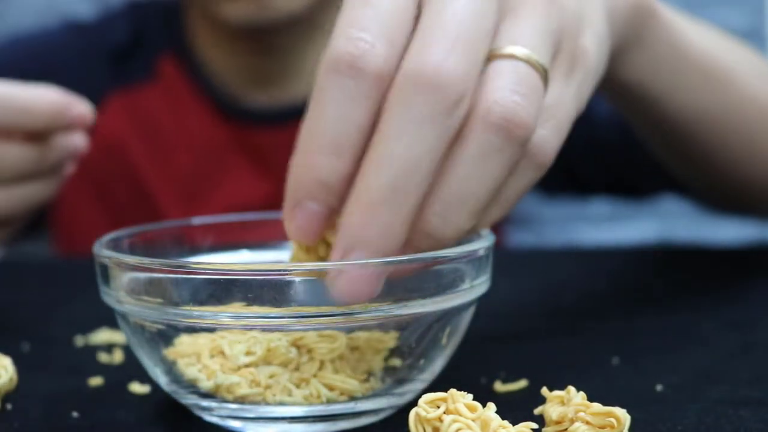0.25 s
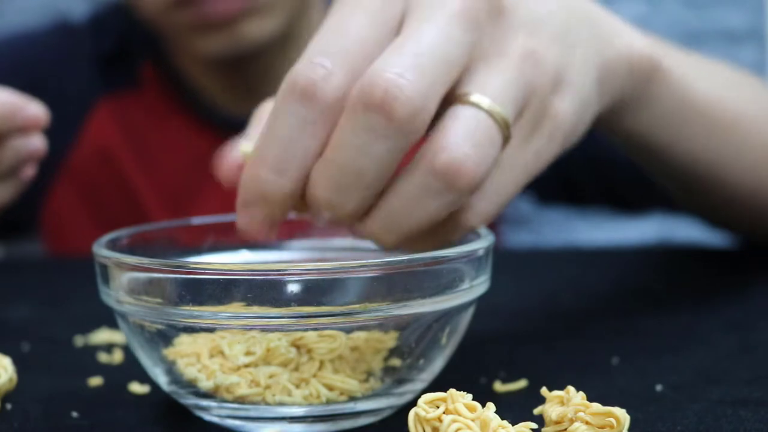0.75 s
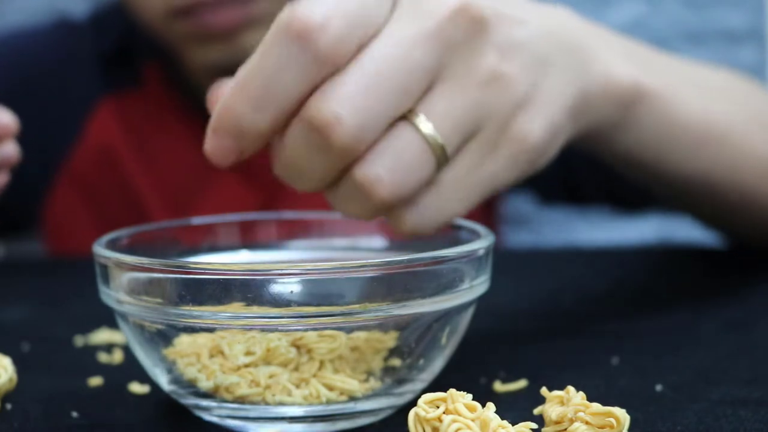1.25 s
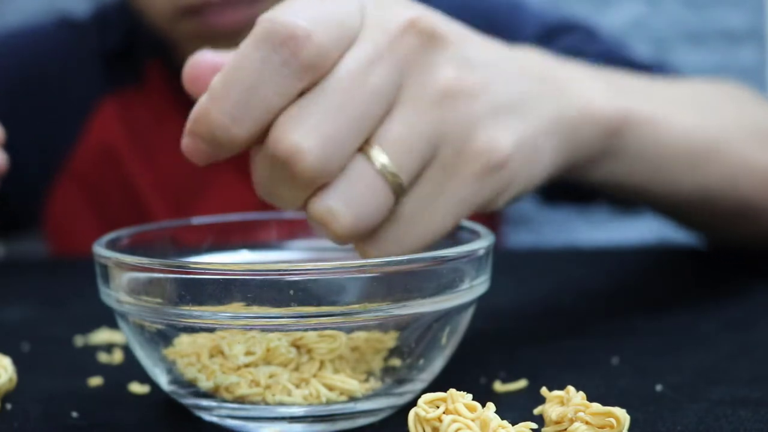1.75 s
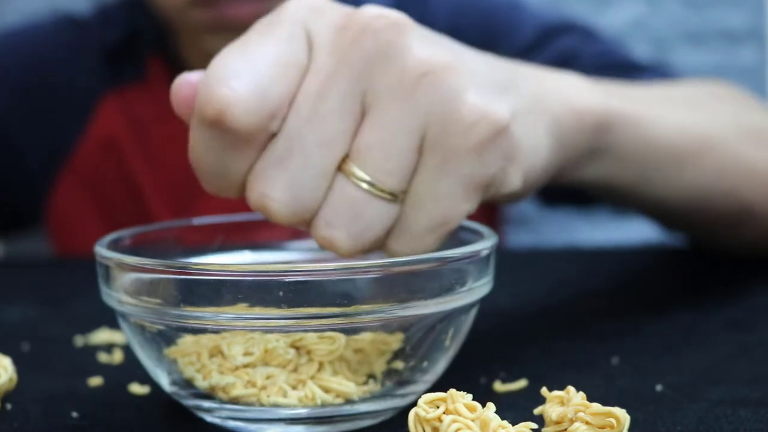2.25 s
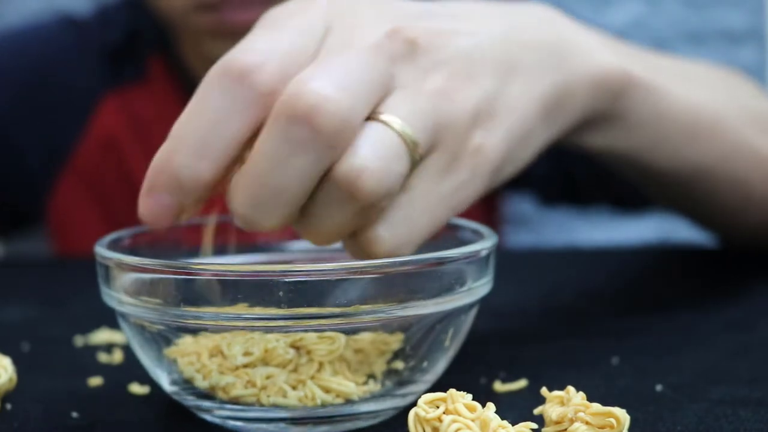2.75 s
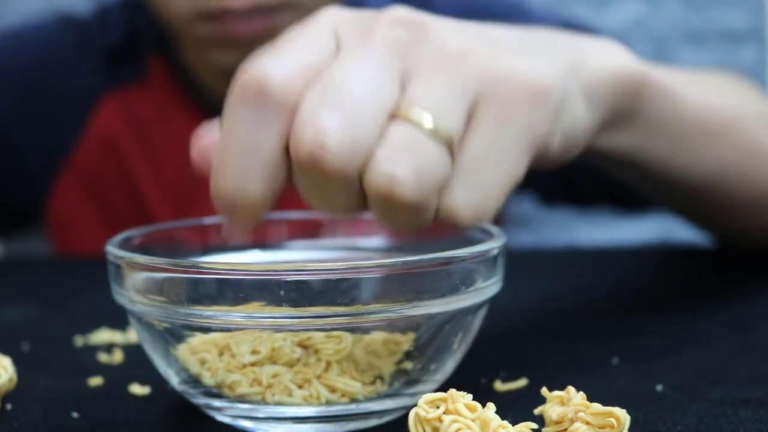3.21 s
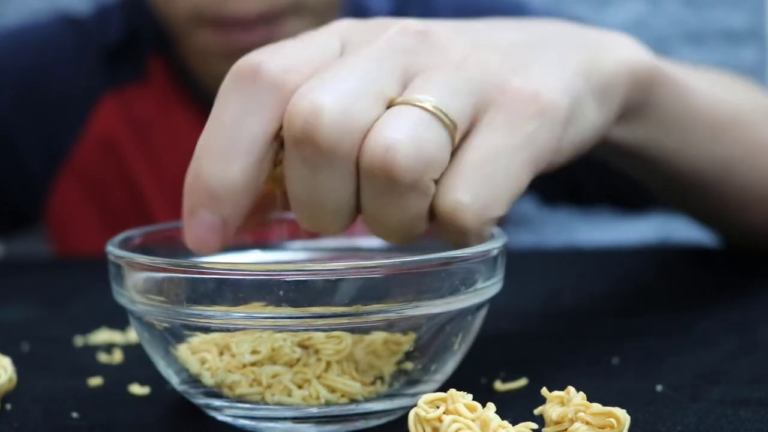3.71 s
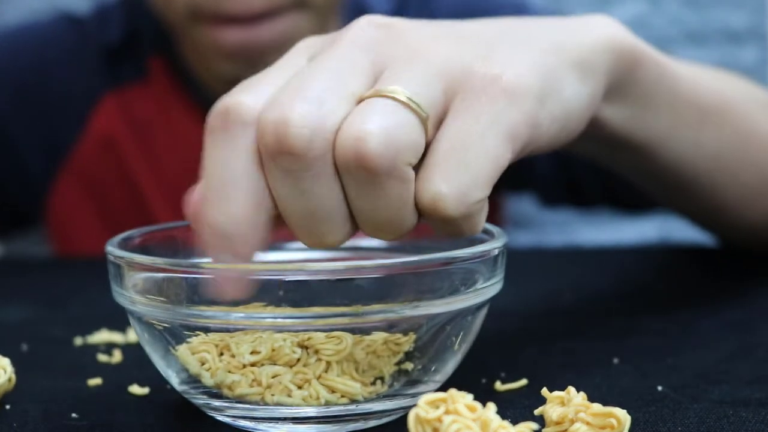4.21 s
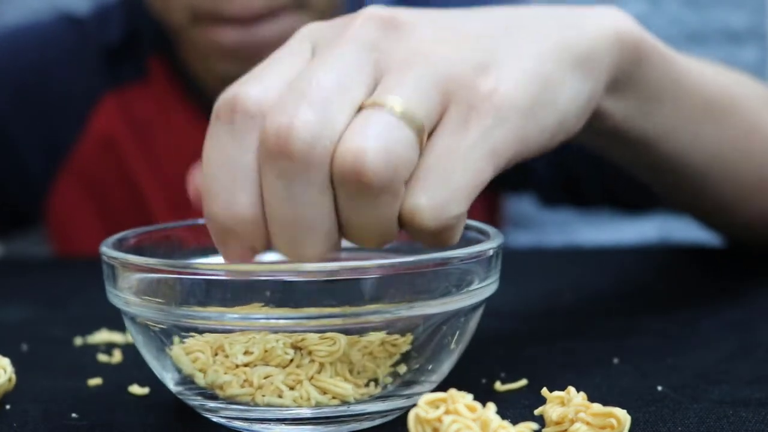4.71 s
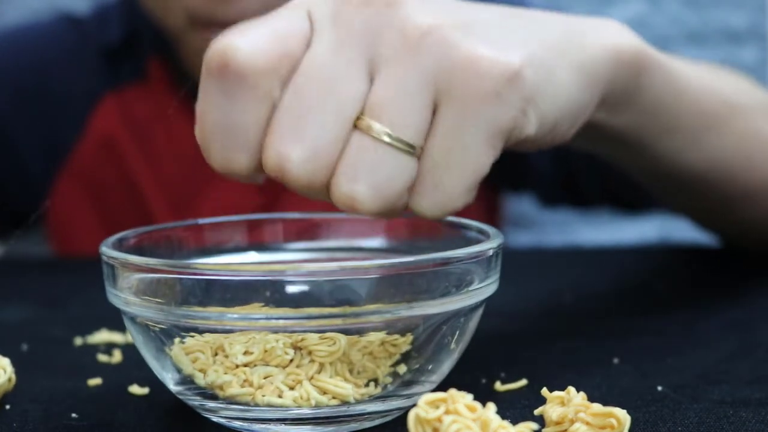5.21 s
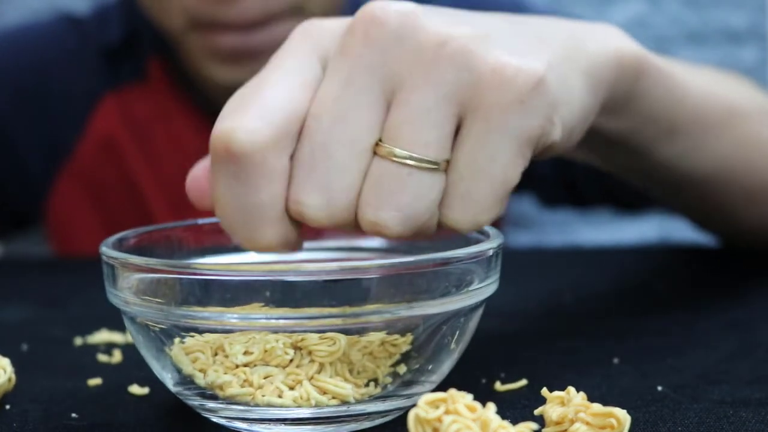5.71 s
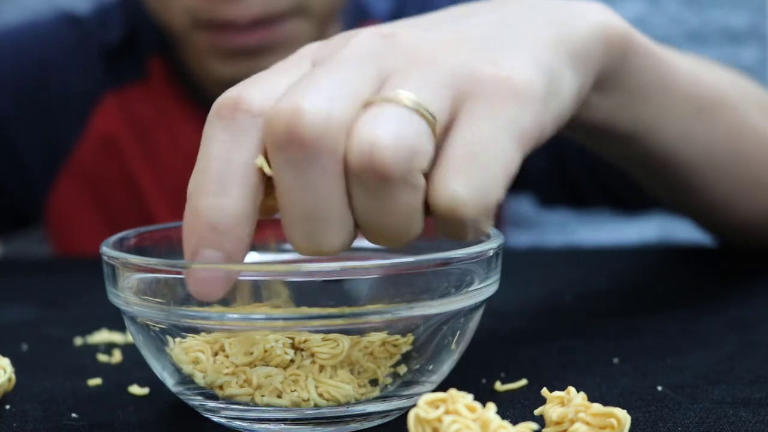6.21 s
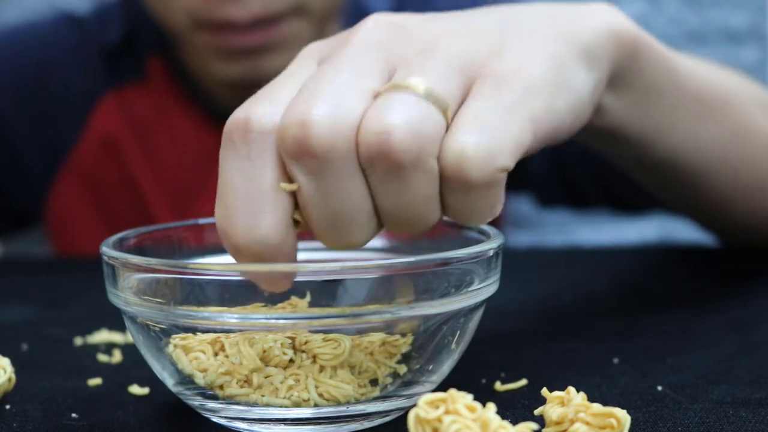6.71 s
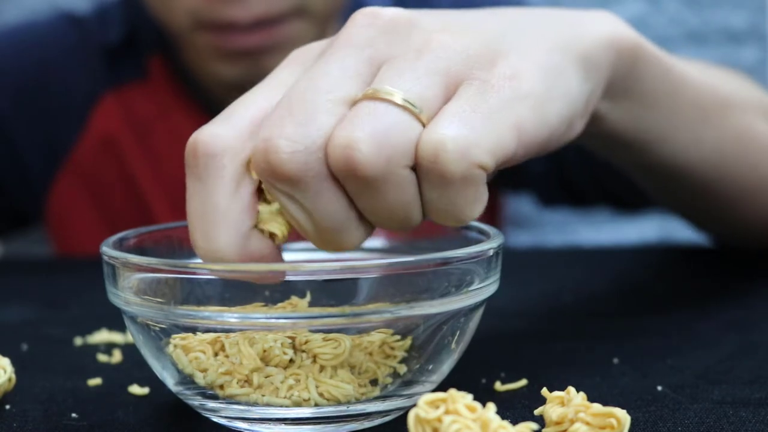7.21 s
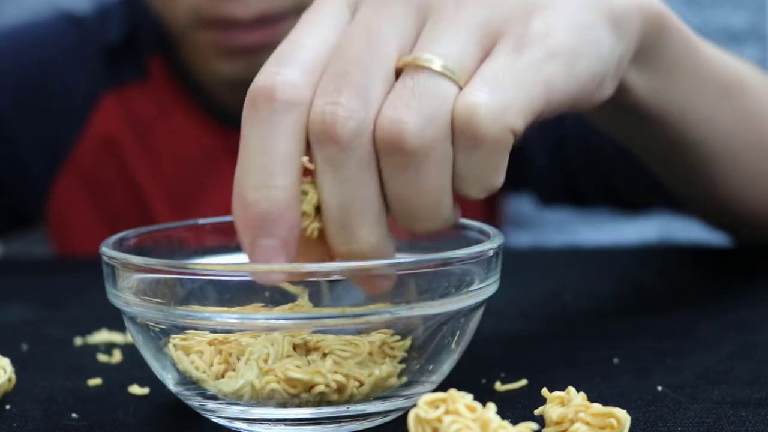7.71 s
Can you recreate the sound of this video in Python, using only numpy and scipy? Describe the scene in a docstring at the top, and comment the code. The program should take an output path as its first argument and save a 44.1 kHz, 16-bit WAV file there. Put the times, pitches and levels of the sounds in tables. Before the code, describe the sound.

Crisp crunching of brittle dry noodles in fingers, coming in bursts between quiet pauses, with faint glassy tinks from a bowl in a small room.

```python
"""Crushing dry noodles over a glass bowl

A hand crushes dry instant noodles close to one microphone in a small room. Strands are filtered bursts
of noise, crumbs are clumped random fractures, and air rings as narrow noise in the closed fist.
Touches ring the bowl's sine modes, and low thumps are decaying bands of noise."""
import sys
import numpy as np
from scipy import signal
from scipy.fft import rfft, irfft
from scipy.io import wavfile
from scipy.ndimage import uniform_filter1d, minimum_filter1d, map_coordinates

SR = 44100
rng = np.random.default_rng(int(sys.argv[2]) if len(sys.argv) > 2 else 0)


def store_pcm(level_fs):
    """Save levels as 16-bit WAV."""
    pcm = np.round(np.clip(level_fs, -1, 1) * 32767).astype(np.int16)
    wavfile.write(sys.argv[1], SR, np.atleast_2d(pcm).T)


N = 350595
TIME = np.arange(N) / SR


def amp(db):
    """Decibels to gain."""
    return 10 ** (np.asarray(db) / 20)


def unit(x):
    """Scaled to rms 1."""
    return x / np.sqrt(np.mean(x ** 2) + 1e-20)


def along(points, hz):
    """Points of (f/Hz, value) read on a log frequency axis."""
    f, v = np.transpose(points)
    return np.interp(np.log(hz + 1), np.log(f), v)


def add(track, s, sound):
    """Mix a sound in at a time in seconds."""
    part = track[max(round(s * SR), 0):][:len(sound)]
    part += sound[:len(part)]


def coloured(x, points, size=2048):
    """EQ to the given spectrum, minimum phase so that nothing smears ahead of a hit."""
    cepstrum = irfft(np.log(amp(along(points, np.fft.rfftfreq(size, 1 / SR)))))
    # folding the cepstrum forward makes the filter causal
    cepstrum[1:size // 2] *= 2
    cepstrum[size // 2 + 1:] = 0
    impulse = irfft(np.exp(rfft(cepstrum)))
    return signal.fftconvolve(x, impulse)[:len(x)]


def resonate(x, hz, width_hz):
    """A steep-sided resonance: a band-pass held inside the audible range."""
    edges = np.clip([hz - width_hz / 2, hz + width_hz / 2], 20, [SR * .44, SR * .48])
    return signal.lfilter(*signal.butter(2, edges, 'band', fs=SR), x)


def wobble(rate):
    """A smooth random curve, rate knots a second."""
    knots = rng.standard_normal(int(N * rate / SR) + 4)
    return map_coordinates(knots, [TIME * rate])


def fractures(size, rate, spread_db, grain_s):
    """Spiky force of rms 1: random tiny breaks, rate a second, their sizes spread by spread_db."""
    happens = rng.random(size) < rate / SR
    breaks = happens * amp(spread_db * np.minimum(rng.exponential(size=size), 4))
    envelope = signal.lfilter([1], [1, -np.exp(-1 / (grain_s * SR))], breaks)
    return unit(envelope * rng.standard_normal(size))


# spectrum of room tone and hiss: (f/Hz, relative level/dB)
AIR_SPECTRUM = [(12, -29), (20, -16.5), (53, 0.5), (111, -3), (147, 0.5), (212, -13), (251, -7),
                (342, -4.5), (794, -11), (2510, -18.5), (6710, -20), (7950, -12.5), (8650, -23),
                (14700, -14.5), (16500, -58)]


def air(tone_db=-61, drone_db=-70, drone_hz=245, drone_width_hz=90):
    """Steady shaped noise for room tone and microphone hiss, with a faint low drone."""
    tone = unit(coloured(rng.standard_normal(N), AIR_SPECTRUM, size=16384))
    drone = unit(resonate(rng.standard_normal(N), drone_hz, drone_width_hz))
    return amp(tone_db) * tone + amp(drone_db) * drone


# skin slides over noodle: (t/s of the peak, level/dB, length/s as the sigma of a bell-shaped swell)
RUBS = [(.145, -67, 0.011), (.226, -50.5, 0.0085), (0.732, -48, 0.0096), (0.758, -52, 0.0062),
        (3.907, -44, 0.024)]
# spectrum of the slide: (f/Hz, relative level/dB)
SKIN = [(1000, -28), (4500, -18), (6200, 3), (8500, -2), (12500, 16), (15500, -14)]


def rubs():
    """Soft noise swishes swell and fade as the fingers shift their grip."""
    swell = sum(amp(db) * np.exp(-.5 * ((TIME - s) / length) ** 2) for s, db, length in RUBS)
    return swell * unit(coloured(rng.standard_normal(N), SKIN))


# narrow resonances around the bowl: (f/Hz, width/Hz, level/dB)
BOWL_ANSWER = [(1577, 35, -2), (2430, 45, -5), (2733, 25, -3), (3260, 45, -2), (4690, 30, -4),
               (4900, 35, -3), (5110, 40, -2), (6120, 60, -5), (9420, 40, -3), (10110, 35, -4),
               (12133, 45, -1), (12440, 80, -6)]


def bowl_answer(x):
    """Narrow resonances colour whatever cracks above the bowl."""
    return sum(amp(db) * resonate(x, hz, width) for hz, width, db in BOWL_ANSWER)


# decay of the room: (f/Hz, t60/s)
ROOM_T60 = [(200, 0.2), (1400, 0.73), (3000, 0.59), (7000, 0.63), (14000, 1)]
# EQ of the room: (f/Hz, level/dB)
ROOM_COLOUR = [(300, 9.5), (1400, -4), (2700, 5.5), (4200, 0), (7500, -1), (10000, 1), (12500, -34),
               (16000, 8)]


def room(x, delay=0.0029, count=6):
    """A diffuse noise tail; each of count equal stretches of time has its own random tail."""
    out = np.zeros(N)
    for piece in np.array_split(np.arange(N), count):
        hz, t, z = signal.stft(rng.standard_normal(SR * 3 // 4), SR, nperseg=256)
        fade = amp(-60 * t / along(ROOM_T60, hz)[:, None])
        tail = signal.istft(z * fade, SR, nperseg=256)[1]
        wet = signal.fftconvolve(x[piece], tail / np.linalg.norm(tail))
        add(out, piece[0] / SR + delay, wet)
    return coloured(out, ROOM_COLOUR)


# placed snaps, loud and faint, after two soft finger ticks:
# (t/s, energy level/dB, body level/dB: higher for a thicker piece)
SNAPS = [(0.958, -77, 22), (1.002, -56.5, -2.5), (1.0698, -44.5, -8.5), (1.404, -17, -19),
         (1.4268, -15.5, -34), (1.483, -9.5, -34.5), (1.5447, -10.5, -19), (1.5522, -23.5, -11.5),
         (1.643, -16.5, -10), (1.65, -9.5, -21.5), (1.7633, -21.5, -3.5), (1.7728, -24.5, 0.5),
         (1.8785, -2, -17), (1.8957, -33, 5), (1.9056, -25, -2), (1.9377, -31.5, 7.5), (1.9859, -30.5, -11),
         (2.0343, -35.5, -14), (2.18, -34, 0), (2.5523, -28.5, -58), (2.863, -42, -31), (2.8759, -33, -27),
         (2.9057, -33, -24), (2.93, -29, -25), (3.0068, -35, -26), (3.02, -26.5, -34), (3.031, -30, -23),
         (3.0615, -30.5, -12), (3.0703, -24, -18), (3.08, -25, -11), (3.087, -23.5, -3),
         (3.1594, -29.5, -4.5), (3.4465, -52, -18), (3.483, -44, -19), (3.518, -42.5, -3),
         (4.2737, -22, -17), (4.42, -52.5, -2), (4.4953, -28.5, -14), (4.513, -32, -23), (4.536, -51, -14),
         (4.5726, -24.5, -22), (4.593, -41, -17), (4.6197, -31, -17), (4.6566, -13.5, -34),
         (4.7026, -9.5, -27.5), (4.7181, -8.5, -30), (4.7257, -12, -21), (4.7366, -19, -32),
         (4.7483, -16, -20), (4.7615, -21, -20), (4.7843, -13, -25), (4.852, -13, -6.5),
         (4.9029, -17, -6.5), (4.91, -12, -15), (4.9568, -14, -20), (4.9631, -15.5, -18),
         (4.9682, -14, -8.5), (5.0114, -17, -13), (5.0202, -12.5, -11), (5.0511, -3.5, -11.5),
         (5.0553, -3.5, -14.5), (5.0873, -14, -4), (5.1706, -25, -1), (5.1791, -11, -14.5),
         (5.208, -24.5, -7), (5.2488, -18, -4.5), (5.2561, -14.5, -9), (5.2984, -21, -2),
         (5.3647, -17.5, -16.5), (5.3743, -8, -5), (5.4, -21, -7), (5.4147, -13.5, -9.5),
         (5.4627, -16.5, -8.5), (5.485, -21.5, -14), (5.71, -25.5, -15), (5.8893, -53, -31),
         (5.941, -34.5, -23), (6.205, -43, -28), (6.293, -38, 2.5), (6.344, -35.5, -11.5),
         (6.3804, -28.5, -26), (6.413, -18.5, -15.5), (6.431, -15.5, -16.5), (6.472, -24, -14),
         (6.531, -25, -36), (6.675, -26, -17), (6.6977, -26.5, -45), (6.728, -27, -11),
         (6.7765, -20, -11.5), (6.8423, -26, -43), (6.8548, -0.5, -17), (6.935, -29, -35),
         (6.9416, -20.5, -42), (6.9595, -20, -35), (7.014, -31, -22), (7.0446, -33, -29),
         (7.0839, -30, -17), (7.112, -32.5, -33), (7.489, -30, -33), (7.5255, -27.5, -12),
         (7.5553, -31.5, -25), (7.6346, -20.5, -20), (7.762, -25.5, -14.5), (7.817, -16, -9),
         (7.8257, -14.5, -7), (7.833, -9, -19), (7.8461, -17, -14), (7.9414, -22.5, -18)]
# resonances of a breaking piece, before scatter: (f/Hz, width/Hz, level/dB)
STRAND = [(813, 326, -16.5), (1440, 300, -0.5), (2502, 330, -10.5), (3490, 580, -11.5), (5250, 305, -13),
          (6016, 1540, -4), (8470, 1820, -7), (10010, 1870, -5), (12550, 1960, 0.5), (14700, 10400, -16)]
# centres of the body, middle, reference and treble bands: f/Hz
BAND_HZ = [1400, 2900, 6300, 12300]
# the more the hand is cupped, the hollower the snaps: (t/s, level/dB of the middle resonances)
CUPPED = [(1.4, 3), (1.55, 6), (1.66, -6), (2.1, -7), (2.87, 20), (3.07, 5.5), (3.2, 3.5), (4.27, -4),
          (4.5, 13), (4.85, 3), (5.3, 2.5), (5.6, -9), (6.0, -17), (6.45, 3.5), (6.85, -8.5), (7.1, -14),
          (7.85, -4)]
# an ordinary strand; smaller and thinner pieces break brighter, thicker ones have more middle
TYPICAL_DB, TYPICAL_BODY_DB = -24, -9.5
MIDDLE_PER_BODY_DB = 0.62
TOP_DB, TOP_PER_DB, TOP_PER_BODY_DB = 2.5, 0.33, 0.2412


def snaps(tear_s=0.0012, tear_scatter_db=2, pitch_scatter=0.055, mode_scatter_db=3.0, splinter_db=-16,
          splinter_t60=0.06, strain_db=-20, strain_t60=.025, crack_db=-22, size=2048):
    """A strand crackles under strain, tears in about a millisecond, then splinters; each has its own pitches."""
    out, t = np.zeros(N), (np.arange(size) - size // 8) / SR
    for s, db, body_db in SNAPS + small_snaps():
        extra_body_db = body_db - TYPICAL_BODY_DB
        middle_db = np.interp(s, *np.transpose(CUPPED)) + MIDDLE_PER_BODY_DB * extra_body_db
        top_db = TOP_DB - TOP_PER_DB * (db - TYPICAL_DB) - TOP_PER_BODY_DB * extra_body_db
        tear_length = tear_s * amp(rng.normal(0, abs(tear_scatter_db)))
        tear = (t > 0) * np.exp(-np.abs(t / tear_length) ** 3)
        chips = fractures(size, rate=900, spread_db=3.5, grain_s=.0006)
        # crackle builds up to the break, splinters die away after it
        chips_db = np.where(t > 0, splinter_db - 60 * t / splinter_t60, strain_db + 60 * t / strain_t60)
        force = tear * rng.standard_normal(size) + amp(chips_db) * chips
        # a broad crack fills the gaps between the resonances of the piece
        snap = amp(crack_db + body_db / 2) * unit(resonate(force, 7500, 14000))
        for hz, width, mode_db in STRAND:
            band_db = np.interp(np.log(hz), np.log(BAND_HZ), [body_db, middle_db, 0, top_db])
            share_db = band_db + mode_db
            ring = resonate(force, hz * np.exp(rng.normal(0, pitch_scatter)), width)
            snap = snap + amp(share_db + rng.normal(0, mode_scatter_db)) * unit(ring)
        # energy is counted as the rms level of one millisecond
        add(out, s + t[0], amp(db) * snap * np.sqrt(SR / 1000 / size))
    return out


# low thumps: bumps on the table, and the overload of one loud snap at 1.879 s:
# (t/s, boom f/Hz, boom level/dB, thud level/dB)
THUMPS = [(1.008, 298, -78, -64), (1.879, 341, -57.5, -62.5), (2.488, 252, -55.5, -67),
          (2.869, 242, -77, -58.5), (4.013, 241, -58.5, -57), (5.932, 248, -56, -75),
          (6.853, 236, -43.5, -59), (6.858, 383, -53, -89), (7.127, 245, -39.5, -52),
          (7.822, 416, -53, -70)]


def thumps(boom_width_hz=55, thud_hz=92, thud_width_hz=40, rise=0.0024, t60=0.61):
    """Each thump is a low boom with a deeper thud beneath, both decaying bands of noise."""
    out, t = np.zeros(N), np.arange(SR // 2) / SR
    envelope = amp(-60 * t / t60) * (1 - np.exp(-t / rise))

    def mode(hz, width):
        """A low resonance driven by noise."""
        return unit(resonate(rng.standard_normal(len(t)), hz, width))

    for s, boom_hz, boom_db, thud_db in THUMPS:
        boom = amp(boom_db) * mode(boom_hz, boom_width_hz)
        thud = amp(thud_db) * mode(thud_hz, thud_width_hz)
        add(out, s, (boom + thud) * envelope)
    return out


# crumbs and fingertips touch the bowl: (t/s, level/dB before trim, hardness/dB per octave, rise/s)
TINKS = [(1.1, -71, 26, .014), (1.196, -64, 2, .012), (2.3996, -34, 3, 0.00074), (2.4863, -29, 7, 0.00062),
         (2.569, -41.5, -3, 0.029), (3.323, -58.5, 13, .009), (3.551, -65, -6, .0045),
         (3.9757, -30.5, 9.5, 0.0003), (4.016, -39.5, 8, 0.00028), (4.135, -40, 10.5, 0.000073),
         (4.397, -62.5, -6, .01), (5.801, -53, 10, .005), (5.856, -47.5, 3, 0.0011),
         (6.036, -45.5, -4.5, 0.0018), (6.412, -45, -0.5, .0015), (6.878, -38.5, 19, .012),
         (7.147, -42.5, -3.5, 0.005), (7.198, -40.5, 1.5, 0.0012), (7.421, -51.5, 7, 0.0035),
         (7.576, -31.5, 13, 0.00077), (7.599, -35.5, 10, 0.00036), (7.675, -34.5, 10, .0003)]
# the bowl's rim modes: (f/Hz, level/dB, t60/s)
GLASS = [(1787, 0, .45), (4022, 0, .34), (6990, 4, .028), (7005, -13, .28), (10603, 0, .13),
         (14750, -10, .14)]
# how strongly a touch reaches the rim modes: (f/Hz, level/dB)
TOUCH = [(1787, -1.5), (4022, 0.5), (6990, 4), (10603, -13.5)]
TOUCH_PIVOT_HZ = 4022  # hardness tilts the spectrum around here


def bowl(trim_db=1, tick_db=-3, tick_t60=0.0029):
    """Touches ring the same rim modes, each with its own brightness and rise; ticks grow with level and hardness."""
    out, t = np.zeros(N), np.arange(SR) / SR
    for s, touch_db, hardness, rise in TINKS:
        drive = [(hz, touch_db + db + hardness * np.log2(hz / TOUCH_PIVOT_HZ)) for hz, db in TOUCH]
        tick_fade_db = touch_db + hardness + tick_db - 60 * t / tick_t60
        ring = amp(tick_fade_db) * rng.standard_normal(SR)
        for hz, db, t60 in GLASS:
            mode = np.sin(2 * np.pi * (hz * t + rng.random()))
            ring += amp(along(drive, hz) + db - 60 * t / t60) * mode
        add(out, s, amp(trim_db) * ring * (1 - np.exp(-t / rise)))
    return out


# the fingers close on the noodles:
# (start t/s, length/s, crackle level/dB before trim, coarse crumbs level/dB relative to it)
SQUEEZES = [(1.402, .2, -36.5, -13), (1.645, .14, -34.5, -6), (1.872, .2, -42, -1), (2.111, .07, -35, -8),
            (2.354, .28, -44, -16), (2.838, .5, -48.5, -10), (3.461, .2, -52, -12),
            (3.893, .05, -46.5, -11), (4.136, .5, -52.5, -10.5), (4.712, .33, -32.5, -5.5),
            (5.05, .44, -35, 0), (5.544, .5, -35, -9.5), (6.093, .17, -46.5, -39), (6.384, .15, -39.5, -14),
            (6.692, .12, -39.5, -2), (6.857, .5, -39, -13.5), (7.503, .22, -37.5, -17),
            (7.815, .14, -30, -9.5)]
# a squeeze bites quickly, eases as the noodles give, then lets go
GRIP_DB_PER_S, EASE_DB_PER_S, RELEASE_DB_PER_S = 899, 9, 124
GRIND_DB_PER_S = 19.5  # big pieces go first, so the coarse crumbs thin out during a squeeze


def pressure(s):
    """Levels of the fine and the coarse crackle (dB) at the given times; the strongest squeeze wins."""
    fine = coarse = np.full(len(s), -100.)
    for start, length, db, coarse_db in SQUEEZES:
        age = np.maximum(s - start, 0)
        grip = GRIP_DB_PER_S * np.maximum(start - s, 0)
        release = RELEASE_DB_PER_S * np.maximum(age - length, 0)
        level = db - grip - EASE_DB_PER_S * age - release
        fine = np.maximum(fine, level)
        coarse = np.maximum(coarse, level + coarse_db - GRIND_DB_PER_S * age)
    return fine, coarse


def small_snaps(count=85, over_db=0.5, scatter_db=3, body_db=-11):
    """Thin strands break at random while the fingers squeeze, as loud as the grip is hard: rows like SNAPS."""
    start, length = np.transpose(SQUEEZES)[:2]
    # lay the squeezes end to end and scatter the breaks evenly over them
    ends = np.cumsum(length)
    place = (np.arange(count) + rng.random(count)) / count * ends[-1]
    which = np.searchsorted(ends, place)
    s = start[which] + ends[which] - place
    fine, coarse = pressure(s)
    level = fine + over_db + scatter_db * rng.standard_normal(count)
    return list(zip(s, level, body_db + coarse - fine))


# spectra of fine and coarse crumbs, shared by crumbs and collapses: (f/Hz, relative level/dB)
FINE = [(2000, -15), (4200, -35.5), (5600, 3.5), (7800, 9), (9800, 1.5), (12200, 14), (14000, 5.5),
        (16000, -1.5)]
COARSE = [(300, -63), (700, -30), (1050, -4.5), (1350, 7.5), (1650, -7.5), (1950, -13.5), (2550, 0.5),
          (3400, -5), (4500, -1.5), (8000, -39)]


def crumbs(fine_trim_db=-3, coarse_trim_db=-4, clump_db=2):
    """Tiny fractures come in clumps as the fingers grind, and follow the pressure of the grip."""
    fine_db, coarse_db = pressure(TIME)
    force = fractures(N, rate=800, spread_db=1.0, grain_s=0.0022) * amp(clump_db * wobble(30))
    fine = amp(fine_db + fine_trim_db) * unit(coloured(force, FINE))
    coarse = amp(coarse_db + coarse_trim_db) * unit(coloured(force, COARSE))
    return fine + coarse


# a piece gives way: (t/s of the peak, length/s as the sigma of a bell-shaped swell, level/dB before trim)
COLLAPSES = [(1.437, 0.0089, -25.5), (1.655, 0.0065, -15.5), (1.903, 0.0089, -20), (2.146, 0.014, -30.5),
             (2.596, 0.011, -39), (4.286, 0.016, -36), (4.704, 0.0054, -27), (4.718, 0.014, -24),
             (4.791, 0.018, -45), (5.088, 0.024, -31), (5.134, 0.011, -29), (5.306, 0.0097, -27.5),
             (5.438, 0.0061, -28), (6.739, 0.0089, -25.5), (6.936, 0.01, -24.5), (7.139, 0.017, -29.5),
             (7.525, 0.0078, -31), (7.833, .0082, -14.5), (7.865, 0.016, -28)]


def collapses(trim_db=-1, coarse_db=-16.5, size=8192):
    """Small fractures pile up and die away within a few hundredths of a second."""
    out, t = np.zeros(N), (np.arange(size) - size // 2) / SR
    for s, length, db in COLLAPSES:
        swell = np.exp(-.5 * (t / length) ** 2)
        force = swell * fractures(size, rate=750, spread_db=-2.0, grain_s=0.00082)
        rush = unit(coloured(force, FINE)) + amp(coarse_db) * unit(coloured(force, COARSE))
        # a longer swell carries more energy at the same level
        add(out, s + t[0], amp(db + trim_db) * np.sqrt(np.mean(swell ** 2)) * rush)
    return out


# hard breaks ring the air in the fist, broader when the hand is looser: (t/s, f/Hz, width/Hz, level/dB)
FIST = [(1.545, 3180, 900, -44), (1.766, 2370, 580, -42.5), (1.879, 2350, 490, -28),
        (2.874, 3080, 1000, -50.5), (3.085, 3300, 1030, -40.5), (5.053, 2670, 1000, -29),
        (5.374, 1250, 400, -43), (6.853, 2710, 520, -39.5)]


def fist(t60=0.59):
    """A hollow ring of band-passed noise lingers in the closed hand after hard breaks."""
    out, t = np.zeros(N), np.arange(SR) / SR
    for s, hz, width, db in FIST:
        ring = unit(resonate(rng.standard_normal(SR), hz, width))
        add(out, s, ring * amp(db - 60 * t / t60))
    return out


def scene(room_db=-11, bowl_room_db=-10, answer_db=-3, answer_delay=.002, room_width_db=-26, air_width_db=-21):
    """Everything reaches one close microphone; only room and air differ a little between the channels."""
    noodles = snaps() + collapses() + crumbs() + rubs()
    glass = bowl()
    add(noodles, answer_delay, amp(answer_db) * bowl_answer(noodles))
    send = amp(room_db) * noodles + amp(bowl_room_db) * glass
    mid = noodles + glass + fist() + thumps() + air() + room(send)
    side = amp(room_width_db) * room(send) + amp(air_width_db) * air()
    return np.array([mid + side, mid - side])


def record(dry, ceiling=1.15, size=64, top_hz=15750):
    """A fast limiter ducks the loudest peaks, their tips clip, and a steep low-pass cuts above top_hz."""
    needed = ceiling / np.maximum(np.abs(dry), ceiling)
    # hold the lowest gain over size samples, then smooth it
    gain = uniform_filter1d(minimum_filter1d(needed, size), size)
    clipped = np.clip(dry * gain, -1, 1)
    low_pass = signal.cheby1(12, .05, top_hz, fs=SR, output='sos')
    return signal.sosfiltfilt(low_pass, clipped)


dry = scene()
out = record(dry)
store_pcm(out)
```